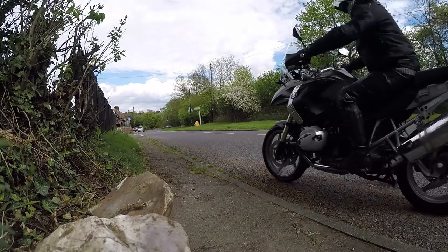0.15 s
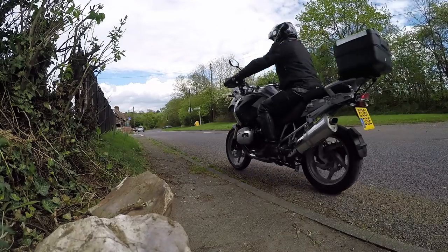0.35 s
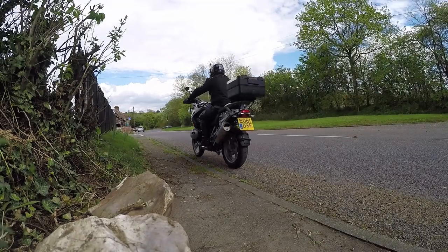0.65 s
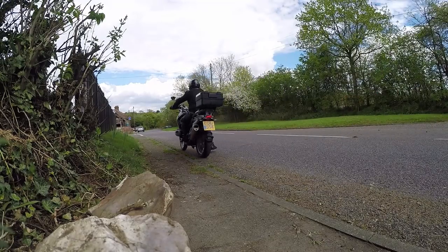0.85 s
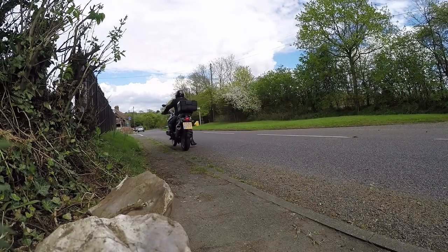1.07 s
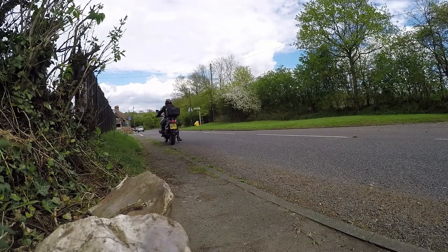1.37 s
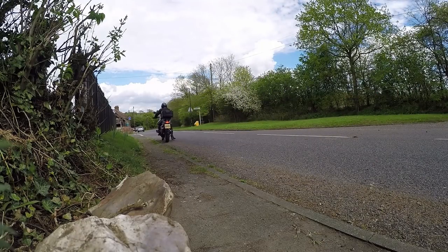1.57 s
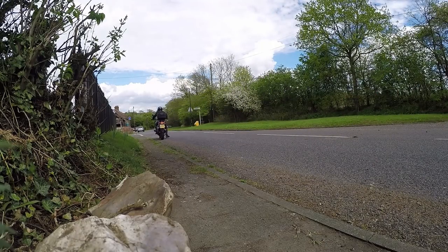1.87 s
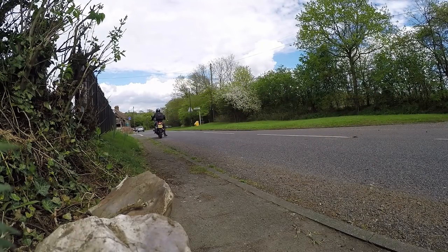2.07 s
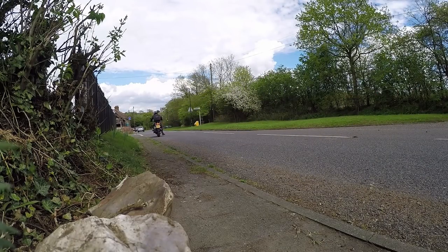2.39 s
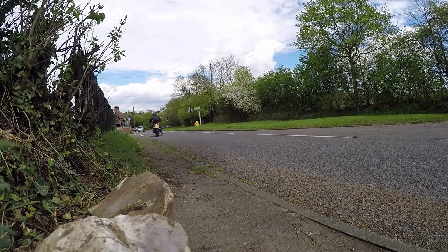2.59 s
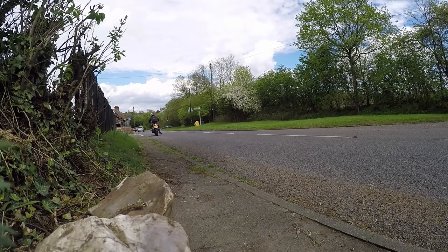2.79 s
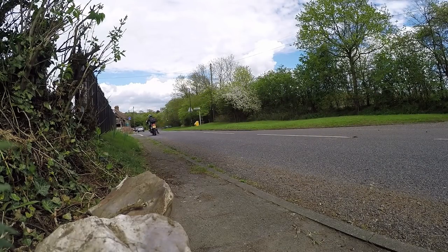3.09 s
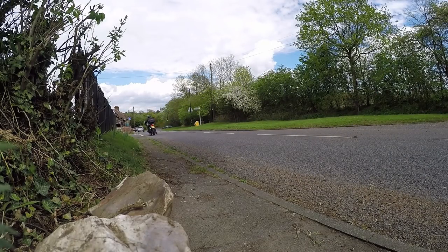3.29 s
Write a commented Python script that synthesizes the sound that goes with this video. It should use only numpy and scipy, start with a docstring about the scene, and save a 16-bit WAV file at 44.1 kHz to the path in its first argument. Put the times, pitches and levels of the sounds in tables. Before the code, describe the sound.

A big motorcycle passes close by, then drops to a low, lumpy rumble.

```python
"""Big twin motorcycle passing

A big twin-cylinder motorcycle passes a few metres away and rides off. Under throttle each firing thumps
the silencer, barks in the tailpipe and rasps with gas. Then the throttle shuts and the engine sinks to a
lumpy idle of piston puffs, burbles and rumble. Tyre hiss fades as the bike coasts away, with a few
clicks of gearbox and grit, over faint road air and one thin, birdlike whistle."""
import sys
import numpy as np
from scipy import signal
from scipy.fft import rfft, irfft
from scipy.io import wavfile
from scipy.ndimage import uniform_filter1d

SR = 44100
rng = np.random.default_rng(int(sys.argv[2]) if len(sys.argv) > 2 else 0)


def digitize_waveform(pressure):
    """Quantize a signal to 16-bit integers and store it at the path in sys.argv[1].

    Rows of a 2-D input are taken as channels; values are limited to [-1, 1].
    """
    field = np.atleast_2d(pressure).T
    bounded = np.clip(field, -1, 1)
    quanta = np.round(bounded * 32767).astype(np.int16)
    wavfile.write(sys.argv[1], SR, quanta)


N = 152145

# crank speed, one firing a turn (time [s], speed [turns/s])
CRANK_SPEED = [(0.0, 38.41), (0.16, 37.73), (0.44, 31.97), (0.52, 32.65), (0.72, 36.48), (0.96, 41.73),
               (1.1, 34.45), (1.4, 26.9), (1.65, 22.09), (1.9, 18.59), (2.6, 18.62), (3.45, 19.01)]
# weight of the firing thumps (time [s], relative level [dB])
THUMP_LEVEL = [(0, -5.5), (.35, -5.5), (.65, -5.5), (.9, -7.5), (.95, -11), (1.0, -22), (1.3, -17.5),
               (1.6, -20.5), (1.85, -17), (2.1, -13), (2.6, -22.5), (3.45, -18)]
# bite of the exhaust (time [s], relative bark level [dB], relative rasp level [dB])
THROTTLE_LEVELS = [(0, 5, -1.5), (.2, 4.5, -5), (.45, -0.5, -2), (.68, -7.5, -9), (.88, -20, -10.5),
                   (.97, -20, -16.5), (1.2, -23.5, -20.5), (2.2, -30, -23), (3.45, -25, -27.5)]
# body of the silencer (frequency [Hz], relative level [dB])
SILENCER_COLOUR = [(12, -14), (36, -10), (62, 2), (85, 1), (115, 4.5), (132, -2.5), (158, -11),
                   (190, -15.5), (228, -17.5), (270, -34.5), (400, -38.5), (900, -82.5)]
# tailpipe resonances (frequency [Hz], width [Hz], relative level [dB])
TAILPIPE_MODES = [(500, 85, 2), (590, 71, 4), (768, 35, -15), (933, 26.5, -12)]
# rasp of escaping gas (frequency [Hz], relative level [dB])
RASP_COLOUR = [(150, -23.5), (400, -0.5), (750, -7), (1150, 2), (1600, -10), (2300, -5), (3500, -12.5),
               (6000, -18), (10000, -23), (15000, -37)]
# push of the gas pumped by the pistons (time [s], relative level [dB])
PUFF_LEVEL = [(0, -19), (.85, -14), (.97, 1), (1.05, 3.5), (1.35, 2.5), (1.55, -3), (1.8, -4), (2.0, -3),
              (2.4, -4), (2.7, -8), (3.45, -9)]
# tone of one soft puff (frequency [Hz], relative level [dB])
PUFF_COLOUR = [(10, -25), (25, -3.5), (40, 9.5), (70, -5.5), (108, -6.5), (160, -24.5), (220, -21.5),
               (320, -29), (900, -77.5)]
# rumble around the engine (time [s], level [dB])
RUMBLE_LEVEL = [(0, -48), (1.0, -42), (1.4, -33), (1.7, -33), (2.0, -28), (2.35, -22), (2.6, -29),
                (3.45, -31)]
# tone of that rumble (frequency [Hz], relative level [dB])
RUMBLE_COLOUR = [(12, -1.5), (35, 3.5), (110, 7), (150, -3), (220, -12), (330, -30), (900, -61.5)]
# tyre and engine hiss (time [s], level [dB])
HISS_LEVEL = [(0, -26), (.22, -31.5), (.45, -36), (.8, -40), (1.1, -45), (1.5, -52.5), (2.1, -51),
              (2.6, -51.5), (3.45, -53)]
# tone of that hiss (frequency [Hz], relative level [dB])
HISS_COLOUR = [(80, 6.5), (300, 6), (700, 0), (950, -2.5), (1500, -8.5), (3000, -13), (5500, -16.5),
               (8000, -23), (9800, -23), (12000, -29), (15000, -30)]
# wash of the distant road (time [s], level [dB])
ROAD_LEVEL = [(0, -54.5), (1.5, -47), (2.1, -44), (2.6, -46.5), (3.45, -53)]
# tone of that wash (frequency [Hz], relative level [dB])
ROAD_COLOUR = [(80, 16), (250, 11), (500, 0.5), (1000, -0.5), (1700, -5.5), (2600, -7), (3600, -12.5),
               (4300, -10.5), (6000, -18.5), (9500, -28), (15000, -36)]
# small clicks (time [s], peak level [dB], centre [Hz], width [Hz], rattle decay [s])
CLICKS = [(0.35, -25, 2160, 3960, 0.0017), (0.428, -25.5, 3320, 6600, 0.02),
          (.463, -20.5, 1170, 900, 0.0013), (.614, -23, 5100, 6500, 0.0083),
          (.726, -27.5, 1110, 700, 0.011), (.826, -38, 9400, 3000, 0.0062), (0.989, -34, 1950, 300, 0.0034),
          (1.042, -37, 1900, 500, 0.0024), (1.068, -43, 1970, 500, 0.0023), (1.096, -42, 1960, 500, 0.0036),
          (1.121, -39, 1700, 900, .004), (1.249, -37.5, 1780, 700, 0.003),
          (1.282, -26.5, 1460, 800, 0.0016), (1.523, -38, 1490, 1500, 0.011),
          (1.855, -42, 3750, 2500, .001), (1.93, -29.5, 1690, 2340, 0.0022),
          (1.969, -43, 12800, 4000, 0.005), (2.058, -33, 2390, 1100, .0015),
          (2.111, -35.5, 1300, 2500, 0.0099), (2.306, -36, 2160, 1300, 0.0021),
          (2.536, -40, 2000, 1210, 0.00096), (2.598, -38.5, 2000, 2500, 0.0036),
          (2.683, -47, 2500, 2500, .001)]
# uneven firings, throttle shut (time [s], relative thump level [dB], relative boom level [dB])
BURBLES = [(1.215, -15, -53), (1.421, -12.5, -35), (1.858, -23, -14.5), (1.913, -40, -15.5),
           (1.969, -14.5, -34), (2.132, -15.5, -19), (2.185, -19, -32), (2.275, -13.5, -30),
           (2.317, -21, -42), (2.344, -14.5, -14), (2.368, -15.5, -14.5), (2.415, -35, -43),
           (2.44, -44, -32), (2.503, -19, -22), (2.557, -16.5, -42), (2.585, -16.5, -29),
           (2.722, -16.5, -25), (2.908, -36, -12.5), (2.934, -27, -14.5), (2.986, -20, -13.5),
           (3.148, -17.5, -37), (3.251, -36, -16.5), (3.359, -16, -47)]

THUMP_DB, BARK_DB, RASP_DB, PUFF_DB, BURBLE_DB, BOOM_DB = -1, -25.5, -30, -18, 4, -1  # mix trims
START_TURN = .27  # crank position at the start
OPEN_SCATTER_DB, IDLE_SCATTER_DB, THROTTLE_SHUT_S = .2, 2, .95  # thumps turn lumpy at idle
GAS_LEAD_S, GAS_DECAY_S, GAS_SCATTER_DB = .004, .0033, 1
BARK_ROUGHNESS, CLICK_ROUGHNESS = .06, .12
WEAK_PUFF_DB, PUFF_LAG_TURNS, PUFF_DELAY_S, PUFF_SCATTER_DB = -8, .52, .005, 1
BOOM_HZ, BOOM_WIDTH_HZ = 37.3, 28.4
BIRD_START_S, BIRD_LENGTH_S, BIRD_HZ, BIRD_WAVER_HZ, BIRD_DB = 3.07, .27, 7000, 90, -69
LOW_CUT_HZ, HIGH_CUT_HZ = 10, 15250


def undb(db):
    """Decibels to gain."""
    return 10 ** (np.asarray(db) / 20)


def at(rows, times, column=1):
    """A table column at the given moments, ramping between rows."""
    rows = np.array(rows)
    return np.interp(times, rows[:, 0], rows[:, column])


def curve(rows, column=1):
    """A table column as an envelope over the whole scene."""
    return at(rows, np.arange(N) / SR, column)


def ring(colour):
    """Minimum-phase impulse response with the given colour, peak 1."""
    size = 32768
    hz, db = np.array(colour).T
    bin_hz = np.maximum(np.arange(size // 2 + 1) * SR / size, 1)
    gain = undb(np.interp(np.log(bin_hz), np.log(hz), db))
    cepstrum = irfft(np.log(gain))
    cepstrum[1:size // 2] *= 2  # fold so that all ringing follows the hit
    cepstrum[size // 2 + 1:] = 0
    response = irfft(np.exp(rfft(cepstrum)))[:size // 2]
    return response / np.abs(response).max()


def mode(hz, width_hz):
    """Impulse response of one resonance."""
    t = np.arange(SR // 4) / SR
    return np.exp(-np.pi * width_hz * t) * np.sin(2 * np.pi * hz * t)


def swell(decay_s):
    """Envelope that rises softly to 1 and dies away."""
    age = np.arange(SR // 10) / SR / decay_s
    return age * np.exp(1 - age)


def through(sound, response):
    """A sound played through an impulse response."""
    return signal.fftconvolve(sound, response)[:N]


def noise(colour):
    """Coloured noise of rms 1."""
    wash = through(rng.standard_normal(N), ring(colour))
    return wash / wash.std()


def pulses(times, sizes):
    """One impulse at each time."""
    return np.bincount(np.clip(times * SR, 0, N).astype(int), sizes, N + 1)[:N]


def turn_times(lag):
    """Moments at which the crank passes a given share of its turn."""
    turns = START_TURN + np.cumsum(curve(CRANK_SPEED)) / SR
    passes = np.arange(1, int(turns[-1] - lag) + 1) + lag
    return np.interp(passes, turns, np.arange(N) / SR)


def firings():
    """Each firing thumps the silencer, rings the tailpipe and lets out a rasping burst of gas."""
    times = turn_times(0)
    thump_luck, gas_luck = rng.standard_normal((len(times), 2)).T
    scatter_db = np.where(times < THROTTLE_SHUT_S, OPEN_SCATTER_DB, IDLE_SCATTER_DB)
    weights = undb(at(THUMP_LEVEL, times) + scatter_db * thump_luck)
    thump = -through(pulses(times, weights), ring(SILENCER_COLOUR))
    kicks = pulses(times - GAS_LEAD_S, undb(GAS_SCATTER_DB * gas_luck))
    bursts = through(kicks, swell(GAS_DECAY_S))
    grain = bursts * rng.standard_normal(N) / np.sqrt(GAS_DECAY_S * SR / 2)
    tailpipe = sum((-1) ** k * undb(db) * mode(hz, width)
                   for k, (hz, width, db) in enumerate(TAILPIPE_MODES))
    bark = through(kicks + BARK_ROUGHNESS * grain, tailpipe)
    rasp = bursts * noise(RASP_COLOUR)
    return (undb(THUMP_DB) * thump
            + undb(BARK_DB + curve(THROTTLE_LEVELS)) * bark
            + undb(RASP_DB + curve(THROTTLE_LEVELS, column=2)) * rasp)


def piston_puffs():
    """The pistons push out two soft puffs of gas a turn, one weak and one strong."""
    pushes = np.zeros(N)
    for lag, accent_db in ((0, WEAK_PUFF_DB), (PUFF_LAG_TURNS, 0)):
        times = turn_times(lag) + PUFF_DELAY_S
        scatter_db = PUFF_SCATTER_DB * rng.standard_normal(len(times))
        pushes += pulses(times, undb(accent_db + at(PUFF_LEVEL, times) + scatter_db))
    return undb(PUFF_DB) * through(pushes, ring(PUFF_COLOUR))


def engine_rumble():
    """A low bed of noise swells around the engine as it idles."""
    return undb(curve(RUMBLE_LEVEL)) * noise(RUMBLE_COLOUR)


def tyres_and_road():
    """Tyre and engine hiss fades with distance into the wash of the road."""
    hiss = undb(curve(HISS_LEVEL)) * noise(HISS_COLOUR)
    road = undb(curve(ROAD_LEVEL)) * noise(ROAD_COLOUR)
    return hiss + road


def clicks():
    """A knock and a short rattle ring one broad resonance: probably gearbox, frame and grit."""
    track, t = np.zeros(N), np.arange(SR // 10) / SR
    for start, db, hz, width, decay in CLICKS:
        knock = t == 0
        rattle = CLICK_ROUGHNESS * rng.standard_normal(len(t)) * np.exp(-t / decay)
        body = through(np.diff(mode(hz, width / 2)), np.diff(mode(hz, width)))
        click = through(knock + rattle, body)[:len(t)]
        first = int(start * SR)
        track[first:first + len(t)] += undb(db) * click / np.abs(click).max()
    return track


def burbles():
    """Heavy firings on the overrun thump the silencer and wake its deepest resonance."""
    times, thump_db, boom_db = np.array(BURBLES).T
    t = np.arange(SR // 10) / SR
    deep_ring = swell(1 / (np.pi * BOOM_WIDTH_HZ)) * np.sin(2 * np.pi * BOOM_HZ * t)
    boom = through(pulses(times + PUFF_DELAY_S, undb(BOOM_DB + boom_db)), deep_ring)
    thump = -through(pulses(times, undb(BURBLE_DB + thump_db)), ring(SILENCER_COLOUR))
    return boom + thump


def bird():
    """One faint, wavering whistle, probably a bird in the trees."""
    waver = uniform_filter1d(rng.standard_normal(N), size=200)
    pitch_hz = BIRD_HZ + BIRD_WAVER_HZ * waver / waver.std()
    progress = np.clip((np.arange(N) / SR - BIRD_START_S) / BIRD_LENGTH_S, 0, 1)
    arch = np.sin(np.pi * progress)
    return undb(BIRD_DB) * arch * np.sin(2 * np.pi * np.cumsum(pitch_hz) / SR)


def scene():
    """The motorcycle, the road and the bird, mixed to mono."""
    engine = engine_rumble() + firings() + piston_puffs() + burbles()
    return (engine + clicks() + tyres_and_road() + bird())[None]


def record(dry):
    """A gentle low cut blocks steady pressure; a steep high cut trims the very top."""
    low_cut = signal.butter(1, LOW_CUT_HZ, "highpass", fs=SR, output="sos")
    high_cut = signal.ellip(10, .2, 80, HIGH_CUT_HZ, fs=SR, output="sos")
    return signal.sosfilt(high_cut, signal.sosfilt(low_cut, dry))


dry = scene()
out = record(dry)
digitize_waveform(out)
```